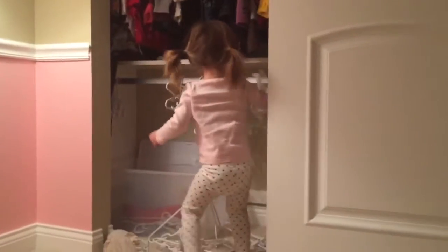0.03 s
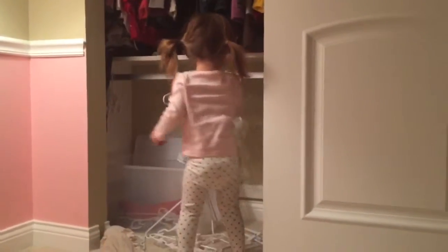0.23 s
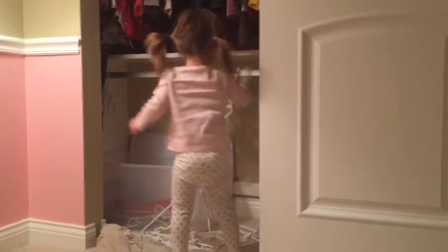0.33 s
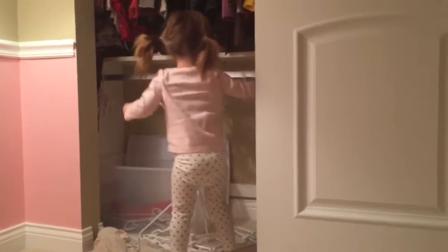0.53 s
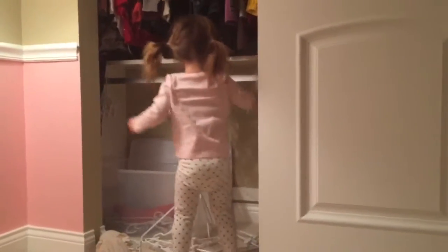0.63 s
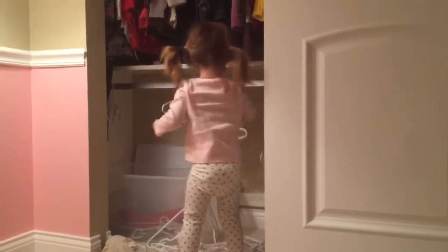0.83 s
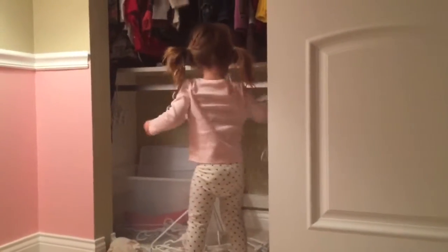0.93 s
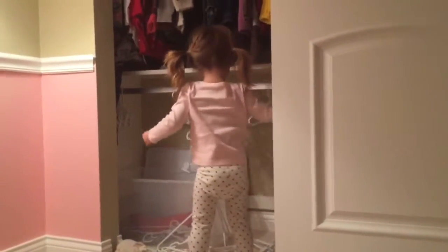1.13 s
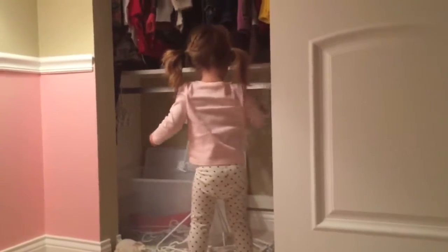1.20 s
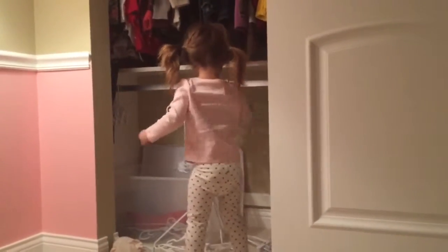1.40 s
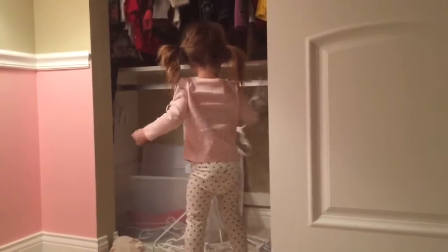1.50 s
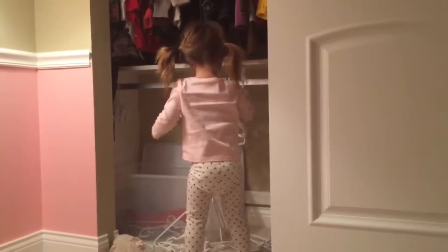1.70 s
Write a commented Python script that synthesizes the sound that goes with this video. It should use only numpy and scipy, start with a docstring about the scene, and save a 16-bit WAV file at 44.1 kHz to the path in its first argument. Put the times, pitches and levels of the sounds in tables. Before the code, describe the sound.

Plastic hangers clack together in quick, uneven bunches while metal hooks tick, ping and briefly squeak on a closet rail. Clothes rustle and panels bump softly underneath, heard from a few metres away in a bedroom with a short echo.

```python
"""Hangers on a closet rail.

A bedroom, one microphone a few metres from a low rail where clothes are being pushed about.
Plastic hangers clack together in bunches; their hooks tick, ping and squeak along the rail.
Clothes rustle, the closet's panels boom softly when bumped, and the room adds a short echo."""
import sys
import numpy as np
from scipy import signal
from scipy.fft import rfft, irfft
from scipy.io import wavfile
from scipy.ndimage import uniform_filter1d

SR = 44100
rng = np.random.default_rng(int(sys.argv[2]) if len(sys.argv) > 2 else 0)


def pcm_store(signal):
    """Save signal as 16-bit PCM."""
    levels = np.round(np.clip(np.atleast_2d(signal), -1, 1) * 32767)
    wavfile.write(sys.argv[1], SR, levels.astype(np.int16).T)


N = 77175
T = np.arange(N) / SR

# The quiet of the house. Each row: frequency in Hz, relative spectral level in dB.
ROOM_TONE_COLOUR = [(25, -43), (70, 24.5), (150, 7), (450, -7), (800, -3.5), (3000, -28), (15000, -40)]
# The bedroom's echo. Each row: frequency in Hz, seconds to die by 60 dB (t60).
ROOM_T60 = [(700, 0.21), (4000, 0.32), (8000, 0.26), (15000, 0.17)]
# Bumps against the closet. Each row: start in seconds, level in dB.
BUMPS = [(0.071,-54),(0.278,-43),(0.359,-46.5),(.45,-49),(0.526,-46),(0.571,-44),(.67,-57),(.68,-49.5),(0.9,-46),(1.05,-41.5),(1.095,-38),(1.189,-48.5),(1.252,-45.5),(1.312,-46.5),(1.376,-44.5),(1.441,-42.5),(1.517,-45.5),(1.612,-56)]
# The closet's panels. Each row: pitch in Hz, peak relative to the bump in dB, t60 in seconds.
PANEL_MODES = [(72.3, -6, 0.51), (85.1, -4, 0.48), (292, -14, 0.11)]
# Sleeves and hangers rubbing. Each row: time in seconds, level in dB.
RUSTLE_LEVELS = [(0, -51), (.12, -71), (.2, -52), (.33, -44.5), (.48, -51.5), (.68, -50), (.77, -47.5),
                 (.84, -48), (1.03, -52), (1.15, -41), (1.23, -51), (1.36, -47), (1.47, -40), (1.55, -68),
                 (1.68, -61.5), (1.71, -69.5)]
# The tone of that rubbing. Each row: frequency in Hz, relative spectral level in dB.
RUSTLE_COLOUR = [(150, -0.5), (300, 1), (450, -9.5), (1000, 3), (2000, 0), (4500, 2.5), (7000, -1),
                 (15000, -2.5)]
# Hooks sliding on the rail. Each row: start and length in seconds, level in dB, first pitch in Hz.
SQUEAKS = [(0.841, 0.02, -39.5, 1920), (0.868, 0.017, -34, 1879), (1.129, .02, -32, 2072)]
# Knocks on rail and shelf. Each row: start in seconds, level in dB, pitch in Hz.
RAIL_KNOCKS = [(.025, -50.5, 729), (0.267, -51.5, 312), (.53, -56, 633), (.752, -53, 582), (.91, -50, 745),
               (1.084, -45.5, 276), (1.135, -41.5, 1047), (1.326, -45, 724)]
# Metal hooks striking the rail. Each row: start in seconds, level in dB, pitch in Hz.
PINGS = [(0.473,-43,4390),(.471,-47.5,3710),(.503,-47,3640),(.513,-40,6800),(0.512,-54,4390),(.902,-36,9250),(1.0468,-28,6760),(1.085,-37,6990),(1.352,-41,7400),(1.353,-43.5,3460)]
# A hook's modes. Each row: multiple of its pitch, relative level in dB, t60 in seconds.
HOOK_MODES = [(0.999, -4.5, 0.066), (1.018, -1, 0.094)]
# Hook tips ticking and plastic arms snapping. Each row: start in seconds, level in dB, centre in Hz.
TICKS = [(.088,-30.5,6200),(.504,-23.5,8000),(0.711,-23.5,12000),(0.808,-43,8000),(0.812,-22.5,11900),(1.294,-18,13100),(1.337,-21.5,11000),(1.414,-30,10000),(1.421,-14.5,11000),(1.5631,-28.5,2820)]
# Resonances all the hangers share. Each row: centre in Hz, width in Hz, boost in dB.
HANGER_RESONANCES = [(1834, 57, 3), (2110, 650, 2), (4970, 530, -3.5), (6800, 680, 3), (9130, 1200, 1.5),
                     (11500, 620, 3)]
# Hangers knocking together. Each row: start in seconds, then low, middle and high band levels in dB.
CLACKS = [(0.021,-45.5,-53,-50),(0.057,-70,-45.5,-42.5),(0.088,-48.5,-57,-45.5),(0.132,-53,-43.5,-45.5),(0.172,-45.5,-52,-66),(0.211,-74,-44,-41.5),(0.236,-44.5,-37.5,-33),(0.243,-39.5,-35.5,-29),(0.257,-41,-32,-26),(0.298,-40,-36,-31.5),(0.311,-40.5,-36,-41),(0.395,-44.5,-41,-38),(0.432,-46.5,-49,-59),(0.461,-67,-38.5,-41.5),(0.502,-40,-34,-34.5),(0.524,-39,-39.5,-36.5),(0.546,-50.5,-39,-39),(0.563,-39,-44,-59),(0.635,-46.5,-47,-44.5),(0.708,-45,-40.5,-34.5),(0.731,-40.5,-38,-32),(0.753,-40,-41.5,-41),(0.776,-42,-38.5,-38),(0.804,-49,-40.5,-34),(0.855,-42,-37.5,-36),(0.87,-41,-34.5,-30),(0.897,-39,-34,-24.5),(0.902,-50,-32.5,-35),(0.918,-40.5,-37.5,-31),(0.988,-40,-43,-62),(1.004,-43,-45,-61),(1.0474,-33,-30.5,-28),(1.065,-51,-34,-32),(1.083,-42.5,-36,-40),(1.123,-67,-40,-32.5),(1.131,-39,-35.5,-36.5),(1.163,-48,-42.5,-41),(1.242,-45,-45,-41),(1.255,-43,-45.5,-56),(1.29,-41.5,-37.5,-35.5),(1.317,-40,-37.5,-38),(1.356,-52,-40,-45),(1.39,-38,-34,-31),(1.398,-36.5,-36.5,-37),(1.409,-46,-34,-29.5),(1.419,-43,-32.5,-27.5),(1.429,-40.5,-31.5,-30),(1.518,-47.5,-46.5,-69),(1.5617,-45.5,-43,-46.5),(1.626,-75,-51.5,-44.5)]
# The edges of those three bands, in Hz.
CLACK_EDGES_HZ = [900, 3000, 8000, 17000]
CRACK_DB, CHATTER_SWELL_S = (-30, -24, 0), (0.0063, 0.0016, 0.0033)   # low, middle, high band


def from_db(db):
    """Decibels to gain."""
    return 10 ** (np.asarray(db) / 20)


def rms_one(x):
    """Scale to unit rms."""
    return x / np.sqrt(np.mean(x ** 2) + 1e-20)


def at_hz(points, hz):
    """Read a table on a log-frequency axis."""
    freqs, values = np.transpose(points)
    return np.interp(np.log(np.maximum(hz, 1)), np.log(freqs), values)


def band(x, low_hz, high_hz, order=2):
    """Band-pass that keeps the rms of white noise."""
    low, high = np.clip([low_hz, high_hz], 10, SR * .48)
    sos = signal.butter(order, [low, high], "band", fs=SR, output="sos")
    return signal.sosfilt(sos, x + 1e-18) * np.sqrt(SR / 2 / (high - low))


def coloured(x, colour):
    """Give a steady noise a spectrum; rms 1."""
    hz = np.arange(N // 2 + 1) * SR / N
    return rms_one(irfft(rfft(x) * from_db(at_hz(colour, hz)), N))


def grit(grain_db):
    """Dense tiny contacts, more uneven in size as grain_db rises; rms 1."""
    size = np.minimum(rms_one(uniform_filter1d(rng.standard_normal(N), size=12)), 2)
    return rms_one(rng.standard_normal(N) * from_db(grain_db * size))


def strikes(s, heights):
    """One impulse for each event."""
    return np.bincount(np.clip(np.asarray(s) * SR, 0, N - 1).astype(int), heights, N)


def dying(s, db, t60):
    """Envelope of events that start at once and die away; their powers add."""
    power_kept = from_db(-60 / (t60 * SR)) ** 2
    return np.sqrt(signal.lfilter([1], [1, -power_kept], strikes(s, from_db(db) ** 2) + 1e-18))


def ring(x, modes):
    """Drive damped modes, each given as pitch in Hz, level in dB, t60 in seconds."""
    out = 0
    for hz, db, t60 in modes:
        r, w = np.exp(-np.log(1000) / (t60 * SR)), 2 * np.pi * hz / SR
        out = out + from_db(db) * signal.lfilter([0, np.sin(w)], [1, -2 * r * np.cos(w), r * r], x + 1e-18)
    return out


def hanger_body(x):
    """Colour a sound with the hangers' resonances."""
    for hz, width_hz, boost_db in HANGER_RESONANCES:
        resonance = signal.lfilter(*signal.iirpeak(hz, hz / width_hz, fs=SR), x)
        x = x + (from_db(boost_db) - 1) * resonance
    return x


def room_tone(level_db=-62.5):
    """The quiet of the house: a faint, steady rumble at the microphone."""
    return from_db(level_db) * coloured(rng.standard_normal(N), ROOM_TONE_COLOUR)


def diffuse_echo(x, build_s=0.002):
    """The bedroom's echo builds quickly and dies soonest in the top treble."""
    edges_hz, tail = np.geomspace(100, 18000, 10), 0
    for low, high in zip(edges_hz, edges_hz[1:]):
        decay = np.exp(-np.log(1000) * T / at_hz(ROOM_T60, np.sqrt(low * high)))
        tail = tail + band(rng.standard_normal(N), low, high) * np.sqrt(high - low) * decay
    tail = tail * (1 - np.exp(-T / build_s))
    return signal.fftconvolve(x, tail / np.sqrt(np.sum(tail ** 2)))[:N]


def shifting_echo(x, shift_hz=7):
    """Knocks come from different spots on the rail, so the sound drifts between two echo patterns."""
    turn = 2 * np.pi * shift_hz * T
    return diffuse_echo(x * np.cos(turn)) + diffuse_echo(x * np.sin(turn))


def closet_bumps(swell_s=0.0078, low_cut_hz=60):
    """Soft, uneven pushes swell and fade, and set each of the closet's panels booming."""
    out = 0
    for s, db in BUMPS:
        age = np.maximum(T - s, 0) / swell_s
        push = rng.standard_normal(N) * age * np.exp(-age)
        for hz, panel_db, t60 in PANEL_MODES:
            boom = ring(push, [(hz, 0, t60)])
            out = out + from_db(db + panel_db) * boom / np.abs(boom).max()
    return signal.sosfilt(signal.butter(4, low_cut_hz, "high", fs=SR, output="sos"), out)


def clothes_rustle():
    """Cloth and plastic rub while the hangers move."""
    rubbing = hanger_body(coloured(grit(grain_db=3.5), RUSTLE_COLOUR))
    return from_db(np.interp(T, *np.transpose(RUSTLE_LEVELS))) * rms_one(rubbing)


def hook_squeaks(sag_hz_per_s=11200, jitter=0.13, overtone_db=-21):
    """A hook sticks and slips along the rail; the slips come unevenly and slow, so the chirp falls."""
    out = 0
    for s, length, db, hz in SQUEAKS:
        age = np.clip(T - s, 0, length)
        uneven = 1 + jitter * rms_one(uniform_filter1d(rng.standard_normal(N), size=24))
        phase = 2 * np.pi * np.cumsum((hz - sag_hz_per_s * age) * uneven) / SR
        tone = np.sin(phase) + from_db(overtone_db) * np.sin(2 * phase)
        out = out + from_db(db) * np.sin(np.pi * age / length) * tone
    return out


def rail_knocks(t60=0.11):
    """Rail and shelf ring low and hollow when knocked."""
    return sum(ring(strikes([s], from_db([db])), [(hz, 0, t60)]) for s, db, hz in RAIL_KNOCKS)


def hook_pings():
    """A wire hook strikes the rail and rings high, at a pitch of its own."""
    out = 0
    for s, db, hz in PINGS:
        modes = [(hz * ratio, mode_db, t60) for ratio, mode_db, t60 in HOOK_MODES]
        out = out + ring(strikes([s], from_db([db])), modes)
    return out


def hanger_ticks(spread=1.32, decay_s=0.00056):
    """Very short cracks: bright from hook tips, lower from plastic arms."""
    noise = np.sign(rng.standard_normal(N))
    t60 = decay_s * np.log(1000)
    return sum(band(noise * dying([s], [db], t60), hz / spread, hz * spread) for s, db, hz in TICKS)


def hanger_arms(mode_count=4, low_hz=1306, high_hz=6003, mode_db=-13, t60=0.048):
    """Each clack rings another hanger's arms at random pitches, in step with its middle band's level."""
    out = 0
    for s, _, middle_db, _ in CLACKS:
        pitches = low_hz * (high_hz / low_hz) ** rng.random(mode_count)
        out = out + ring(strikes([s], from_db([middle_db])), [(hz, mode_db, t60) for hz in pitches])
    return out


def hanger_clacks(crack_decay_s=0.0012, chatter_t60=0.051, rail_db=-15, thud_db=-24):
    """Hangers meet with a crack and buzz on against each other; the rail and a dull thud answer below."""
    starts, *bands_db = np.transpose(CLACKS)
    plastic = 0
    for i, db in enumerate(bands_db):
        crack = grit(grain_db=0) * dying(starts, db + CRACK_DB[i], crack_decay_s * np.log(1000))
        lag = np.exp(-1 / (CHATTER_SWELL_S[i] * SR))   # the chatter builds up, slowest in the lows
        swell = signal.lfilter([1 - lag], [1, -lag], dying(starts, db, chatter_t60))
        chatter = grit(grain_db=4) * swell
        plastic = plastic + band(crack + chatter, CLACK_EDGES_HZ[i], CLACK_EDGES_HZ[i + 1], order=3)
    push = grit(grain_db=0) * dying(starts, bands_db[0], chatter_t60)
    hollow_rail = from_db(rail_db) * band(push, low_hz=713, high_hz=777)
    thud = from_db(thud_db) * band(push, low_hz=120, high_hz=327)
    return hanger_body(plastic) + hollow_rail + thud


def scene(echo_db=-4, ring_send_db=-2.5):
    """From across the bedroom: hangers and their echo, over rustle, closet boom and room tone."""
    clatter = hanger_clacks() + hanger_arms() + hanger_ticks()
    rings = hook_pings() + rail_knocks() + hook_squeaks()   # these raise less echo than the clatter
    echoes = from_db(echo_db) * shifting_echo(clatter + from_db(ring_send_db) * rings)
    background = room_tone() + clothes_rustle() + closet_bumps()
    return (background + echoes + rings + clatter)[None]


def record(dry, cutoff_hz=15350):
    """The microphone's one channel, with the top treble cut steeply."""
    return signal.sosfilt(signal.ellip(10, .2, 70, cutoff_hz, fs=SR, output="sos"), dry)


dry = scene()
out = record(dry)
pcm_store(out)
```